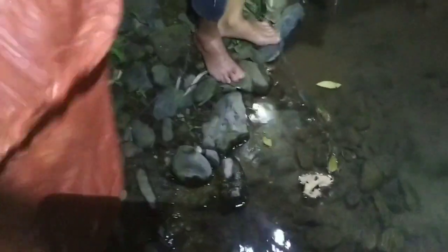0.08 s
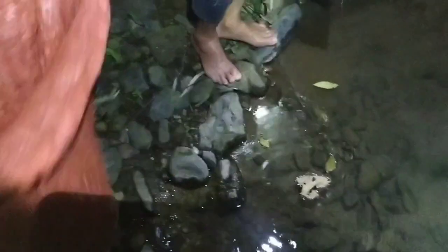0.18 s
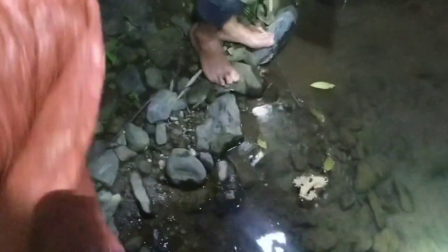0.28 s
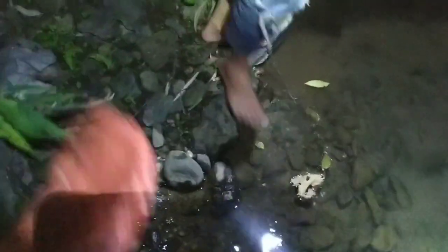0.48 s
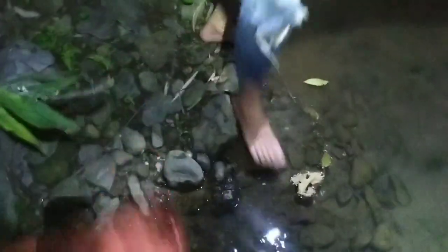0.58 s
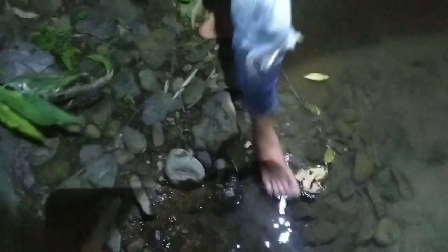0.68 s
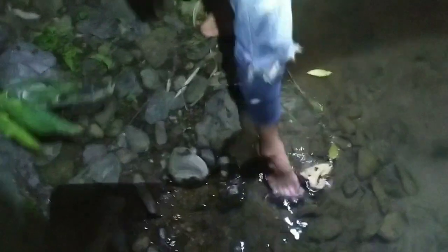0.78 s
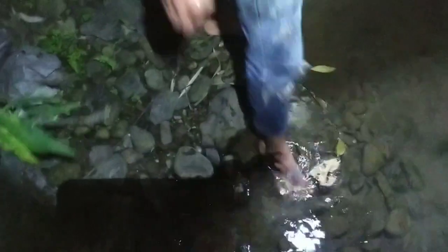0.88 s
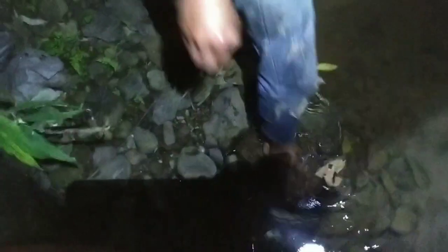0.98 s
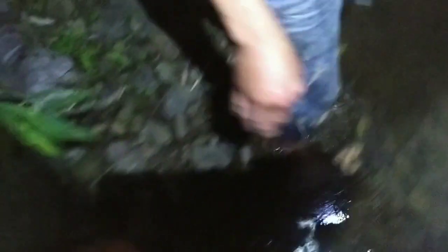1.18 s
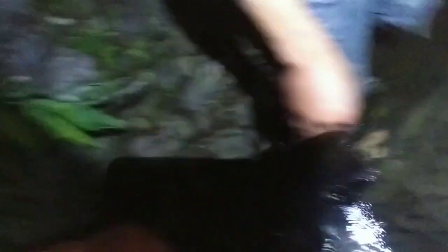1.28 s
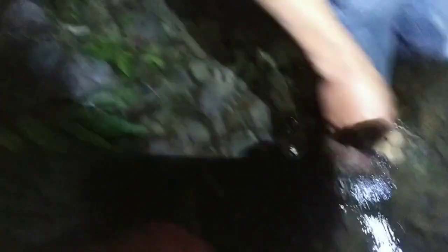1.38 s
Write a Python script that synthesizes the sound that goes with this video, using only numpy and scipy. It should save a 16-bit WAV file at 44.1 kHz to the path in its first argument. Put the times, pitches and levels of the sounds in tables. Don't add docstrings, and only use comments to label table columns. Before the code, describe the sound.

Handling thump first: a finger slaps the left port of a small stereo device, hiss ducks there and returns; afterwards a foot steps into the shallow stony stream with a dull slap, sharp tick and bubbles, all very close.

```python
import sys
import numpy as np
from scipy import signal
from scipy.fft import rfft, irfft
from scipy.io import wavfile
from scipy.ndimage import uniform_filter1d

SR = 44100
rng = np.random.default_rng(int(sys.argv[2]) if len(sys.argv) > 2 else 0)


def natural_amplitude(level_db):
    exponent = np.asarray(level_db, float) / 20
    return 10 ** exponent


def transcribe(signal):
    frames = np.atleast_2d(signal).T
    limited = np.clip(frames, -1, 1)
    pcm = np.round(limited * 32767).astype(np.int16)
    wavfile.write(sys.argv[1], SR, pcm)


N = 61740
PLOP_S = .8

# start_s, size (full scale)
STEPS = [
    (.24673, .84),
    (.26003, -.45),
    (.26024, .64),
]


def curve(rows):
    return np.interp(np.arange(N) / SR, *np.array(rows).T)


def unit(x):
    return x / np.sqrt(np.mean(x ** 2))


def shape(x, response):
    f = np.arange(N + 1) * SR / (2 * N) + 1e-3
    return irfft(rfft(x, 2 * N) * response(f), 2 * N)[..., :N]


def ring(f, hz, wide_hz):
    return 1 / (1 + 1j * (f - hz * hz / f) / wide_hz)


def walk(rate_hz):
    k = int(SR / rate_hz)
    held = np.repeat(rng.standard_normal(N // k + 1), k)
    return unit(uniform_filter1d(uniform_filter1d(held, k), k)[:N])


def finger_pressure():
    # start_s, pressure (full scale)
    suction = [
        (.272, -.8),
        (.34, -.79),
        (.4, -.51),
        (.46, -.42),
        (.55, -.1),
        (.6, -.02),
        (.7, .028),
        (.85, .027),
        (1.4, .005),
    ]
    sag_per_s, sag_ends_s = 19, .2565
    rise_s, kick, kick_s = .000022, .13, .0003
    lets_go_s, vent_s, vent_size = .272, .026, 1.65
    t = np.arange(N) / SR

    def edge(at):
        return .5 + .5 * np.tanh((t - at) / rise_s)

    lands_s = STEPS[0][0]
    pressed = -sag_per_s * (np.clip(t, lands_s, sag_ends_s) - lands_s)
    for at, size in STEPS:
        pressed = pressed + size * edge(at)
        if size > 0:
            pressed = pressed + kick * (edge(at) - edge(at + kick_s))

    slow = curve(suction)
    for _ in range(2):
        slow = uniform_filter1d(slow, SR // 40, mode="nearest")
    vent = np.exp(-np.maximum(t - lets_go_s, 0) / vent_s)
    released = vent_size * vent + slow
    i = int(lets_go_s * SR)
    held = pressed[i] - released[i]
    return np.where(t < lets_go_s, pressed, released + held * vent)


def case_ring():
    case_hz = [1750, 2700, 750]
    level_db, t60_s = -23, .014
    late = np.maximum(np.arange(N) / SR - STEPS[2][0], 0)
    modes = sum(np.sin(2 * np.pi * hz * late) for hz in case_hz)
    return modes * natural_amplitude(level_db - 60 * late / t60_s)


def creak():
    at_s, long_s, hz, wide_hz, level_db = .2575, 0.00074, 2220, 1500, -24
    noise = unit(shape(rng.standard_normal(N), lambda f: ring(f, hz, wide_hz) ** 2))
    return natural_amplitude(level_db) * noise * np.exp(-((np.arange(N) / SR - at_s) / long_s) ** 2)


def wobble():
    hz, wide_hz, level_db, from_s, fade_s = 59, 73, -34, .3, 0.17
    u = np.maximum(np.arange(N) / SR - from_s, 0) / fade_s
    noise = unit(shape(rng.standard_normal(N), lambda f: ring(f, hz, wide_hz) ** 3))
    return natural_amplitude(level_db) * noise * np.minimum(u * 8, 1) * np.exp(-u ** 2)


def impulse(at_s):
    return 1. * (np.arange(N) == int(at_s * SR))


def slap():
    hz, wide_hz, level_db = 950, 600, -3
    return natural_amplitude(level_db) * shape(impulse(PLOP_S), lambda f: ring(f, hz, wide_hz))


def ticks():
    # start_s, pitch_hz, level_db
    strikes = [
        (.2395, 10000, -15),
        (.2402, 10300, -10),
        (.7908, 10200, -11),
        (.8005, 10500, -12),
        (.8013, 11200, 1),
    ]
    wide_hz, right_db = 2200, -16
    tick = sum(natural_amplitude(db) * shape(impulse(at), lambda f: ring(f, hz, wide_hz) ** 2) for at, hz, db in strikes)
    return tick * natural_amplitude(np.array([[0], [right_db]]))


def spray():
    # peak_s, level_db, rise_s, fall_s, left_minus_right_db
    bursts = [(.68, -40, 0.007, 0.013, 13), (.779, -34, 0.0055, 0.0077, 12),
              (0.8013, -34, 0.00087, .003, 2), (0.877, -42, .004, 0.0036, 15),
              (0.906, -36.5, 0.0099, 0.02, 7), (.927, -45, .003, .004, -9),
              (1.056, -26.5, .0005, 0.0018, -2), (1.073, -23.5, 0.00032, 0.00083, -5),
              (1.105, -30, 0.00067, 0.0014, -8), (1.114, -28.5, 0.0007, 0.0027, 7),
              (1.13, -31, 0.0026, 0.0039, 5), (1.348, -30, .001, 0.0023, 1)]
    hz, wide_hz = 9600, 4100
    t, env = np.arange(N) / SR, 0
    for at, db, rise, fall, pan_db in bursts:
        burst = np.exp(-np.where(t < at, (at - t) / rise, (t - at) / fall))
        env = env + natural_amplitude(db + np.array([[pan_db], [-pan_db]]) / 2) * burst
    return shape(env * rng.standard_normal((2, N)), lambda f: ring(f, hz, wide_hz) ** 2)


def bubbles():
    # start_s, pitch_hz, peak_db, length_s, glide_octaves
    pockets = [(0.056, 675, -42.5, 0.019, -0.025), (0.225, 354, -41, 0.024, 0.36),
               (0.458, 365, -45, 0.018, 0.095), (0.826, 710, -48, .015, -0.058),
               (0.881, 387, -44, 0.024, -0.21), (.91, 252, -45, 0.022, 0.1), (0.914, 844, -47, 0.022, 0.11),
               (.945, 513, -47.5, 0.02, 0.064), (.948, 245, -42, 0.038, 0.11),
               (1.004, 328, -40.5, 0.0256, 0.436), (1.008, 490, -49, 0.023, .02),
               (1.022, 396, -44, 0.012, 0.055), (1.034, 460, -42.5, 0.019, 0.076),
               (1.043, 280, -46, 0.023, -0.0017)]
    plop = (PLOP_S, 764, -33, 0.016, -0.17)
    t, out = np.arange(N) / SR, 0
    for at, hz, db, length, glide in pockets + [plop]:
        u = np.clip((t - at) / length, 0, 8)
        rise = 0.23 * min(length / 0.02, 1)
        pitch_hz = hz * 2 ** (glide * np.minimum(u, 1)) * (u > 0)
        phase = 2 * np.pi * np.cumsum(pitch_hz) / SR
        env = (1 - np.exp(-u / rise)) * np.exp(-u ** 2 * 1.24)
        out = out + natural_amplitude(db) * env * np.sin(phase)
    return out


def gurgle():
    count, low_hz, octaves = 220, 599, 2.3
    cycles, glide, level_db, spread_db = 32.2, 0.0415, -54, 5.5
    out = np.zeros(N + SR)
    for at, pitch, size in rng.random((count, 3)):
        hz = low_hz * 2 ** (octaves * pitch)
        turns = np.arange(int(2 * cycles / hz * SR)) * hz / SR
        tone = np.sin(2 * np.pi * turns * (1 + glide * turns / cycles))
        env = (1 - np.exp(-turns)) * np.exp(-2.5 * turns / cycles)
        i = int(at * N)
        out[i:i + len(tone)] += natural_amplitude(level_db + spread_db * (2 * size - 1)) * tone * env
    return out[:N]


def stream():
    # colour_hz, level_db
    water = [(25, 11), (60, 2.5), (140, -5.5), (280, -0.5), (1000, -1.5), (4000, -2), (10000, 0),
             (14000, -8)]
    # time_s, level_db
    flow = [(0, 0), (.2, -1), (.47, 0.5), (.6, -1), (.68, -0.5), (.74, 0.95), (.9, 0.5), (1.0, 0),
            (1.11, 0.8), (1.22, -1), (1.33, 0.9), (1.4, -0.5)]
    drops_per_s, drop_spread_db, drop_share = 2500, 7, 0.17
    alike_share, alike_below_hz, left_late_s = 0.84, 1940, 0.00029
    level_db, swell_db, flicker_db = -41.5, 0.1, 1.0

    sizes = rng.standard_normal((3, N)) * natural_amplitude(drop_spread_db * rng.random((3, N)))
    drops = unit(sizes * (rng.random((3, N)) < drops_per_s / SR))
    raw = np.sqrt(1 - drop_share) * rng.standard_normal((3, N)) + np.sqrt(drop_share) * drops

    def alike(f):
        return alike_share / (1 + (f / alike_below_hz) ** 2)

    common = shape(raw[2], lambda f: np.sqrt(alike(f)))
    own = shape(raw[:2], lambda f: np.sqrt(1 - alike(f)))
    ports = own + [np.roll(common, int(left_late_s * SR)), common]
    hz, db = np.array(water).T
    ports = unit(shape(ports, lambda f: natural_amplitude(np.interp(np.log(f), np.log(hz), db)) * (f > 18)))

    out, swell = 0, swell_db * walk(6.9)
    for centre in np.arange(4, 15.5, .5):
        band = shape(ports, lambda f: np.clip(1 - 2 * abs(np.log2(f) - centre), 0, 1))
        out = out + band * natural_amplitude(swell + flicker_db * walk(25.13))
    return out * natural_amplitude(level_db + curve(flow))


def port(x, rows, level_db):
    response = lambda f: 1 + sum(natural_amplitude(db) * ring(f, hz, wide) for hz, wide, db in rows)
    return shape(x, response) * natural_amplitude(level_db)


def scene():
    # centre_hz, width_hz, level_db over the flat path
    left_modes = [(2106, 695, 5), (6500, 790, 6.5), (9770, 1340, 10.5), (11300, 800, -5)]
    right_modes = [(2000, 840, 0.045), (6310, 485, 11.7), (8230, 1120, 13.3), (8800, 300, 1.7)]
    # left_db, right_db
    port_db = [-3, -0.38]
    # time_s, hiss_db
    cover = [
        (.246, 3.1),
        (.249, -8),
        (.261, 12.5),
        (.267, -27),
        (.29, -16),
        (.31, -7),
        (.39, -1.5),
        (.44, 1.5),
        (.47, 5),
    ]
    thump = finger_pressure() + case_ring() + creak() + wobble()
    air = slap() + ticks() + spray() + bubbles() + gurgle() + stream()
    left = port(air[0], left_modes, port_db[0] + curve(cover)) + thump
    right = port(air[1], right_modes, port_db[1])
    return np.array([left, right])


def band_limit(x):
    return signal.sosfilt(signal.butter(12, 14450, fs=SR, output="sos"), x)


def record(dry):
    limited = np.clip(dry, -1, 1)
    cut = shape(limited, lambda f: np.clip((14450 - f) / 80, 0, 1))
    return band_limit(cut)


dry = scene()
out = record(dry)
transcribe(out)
```